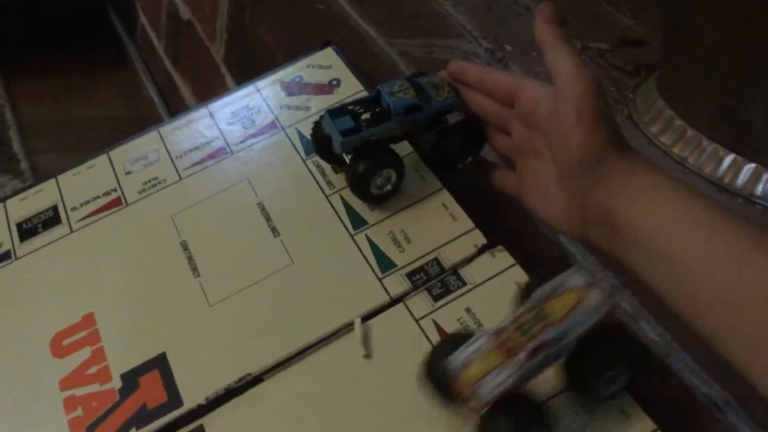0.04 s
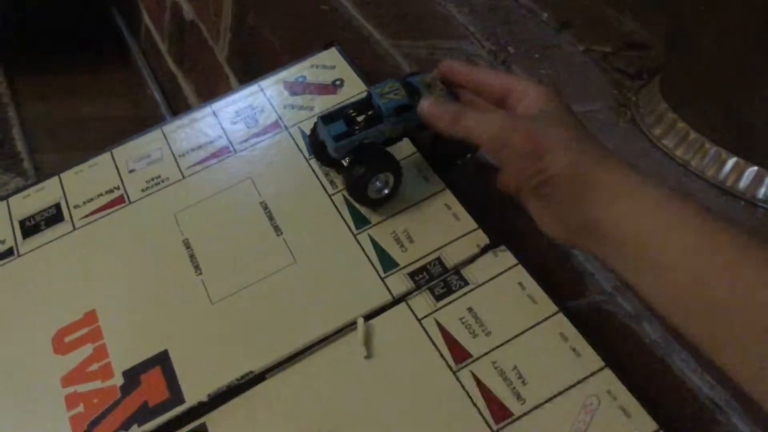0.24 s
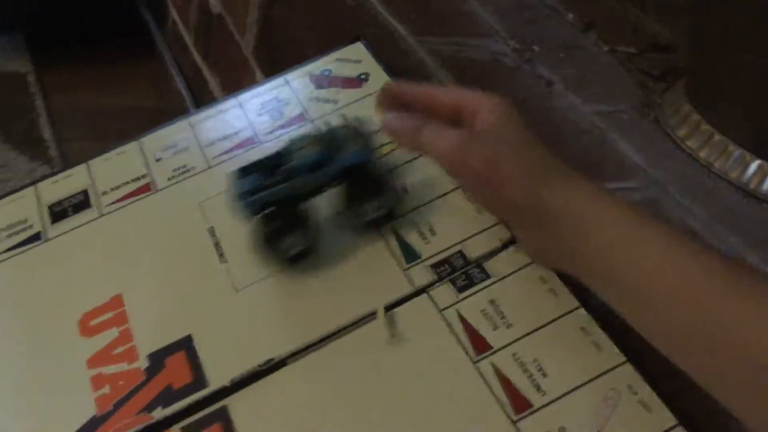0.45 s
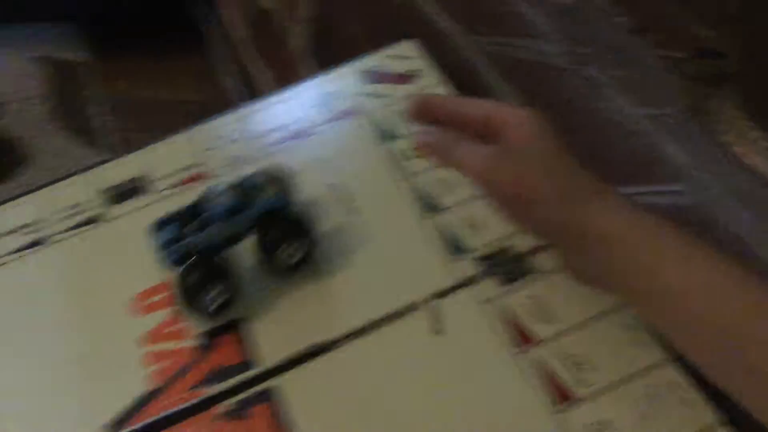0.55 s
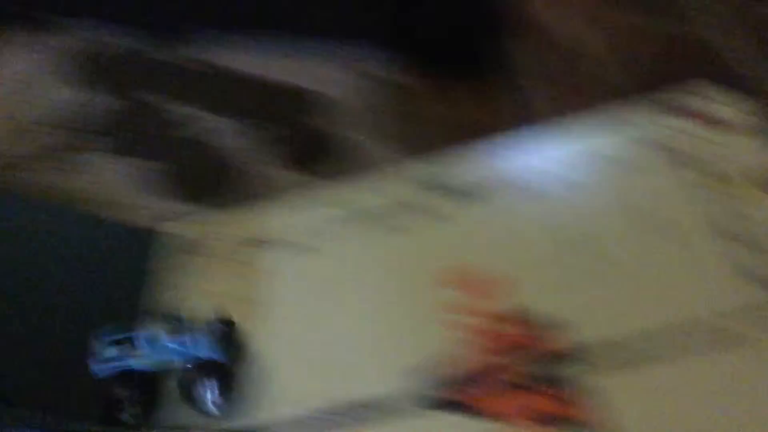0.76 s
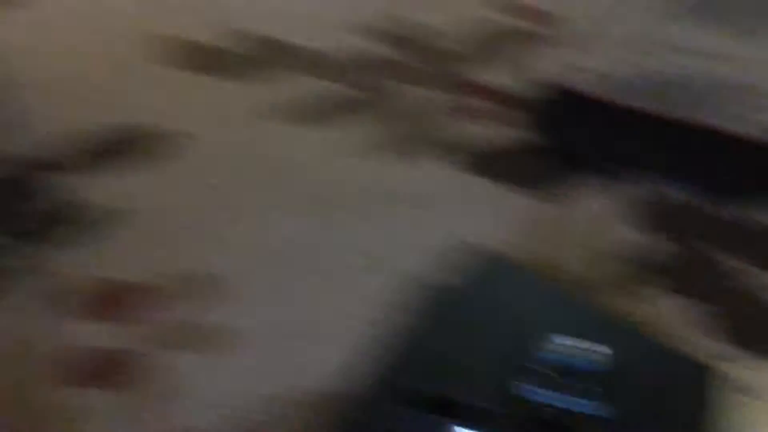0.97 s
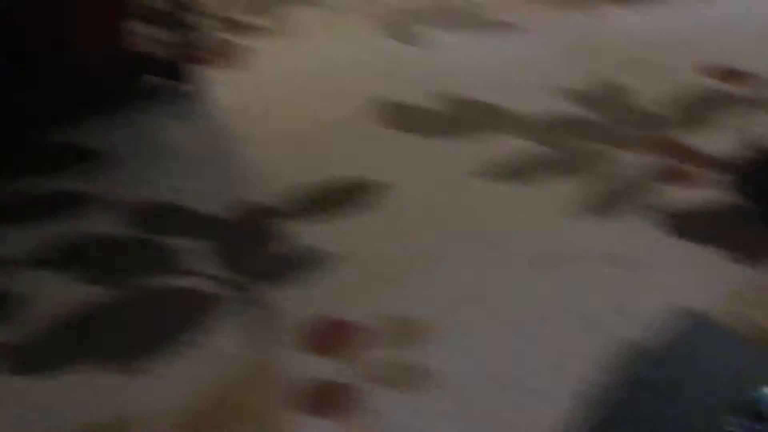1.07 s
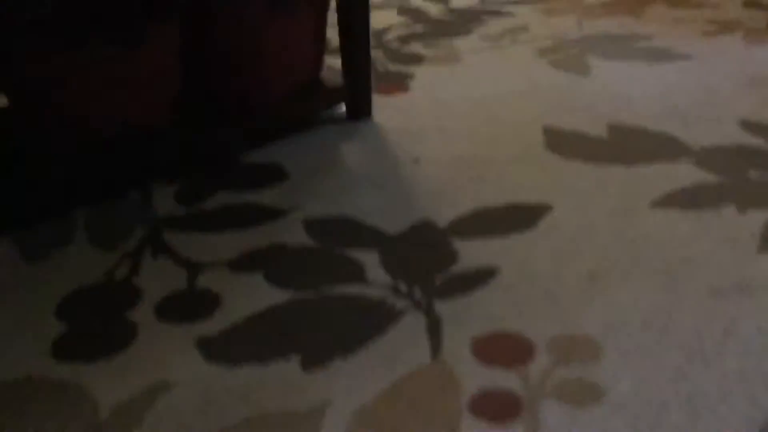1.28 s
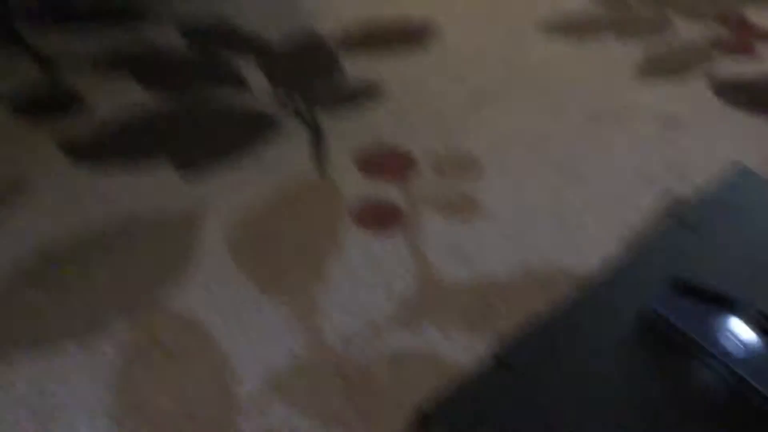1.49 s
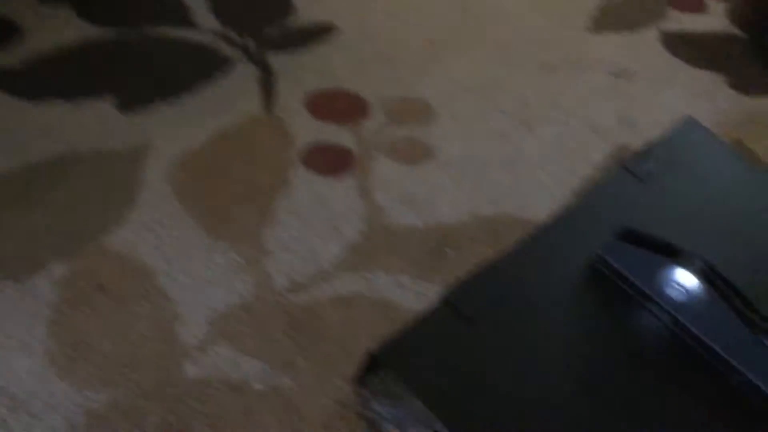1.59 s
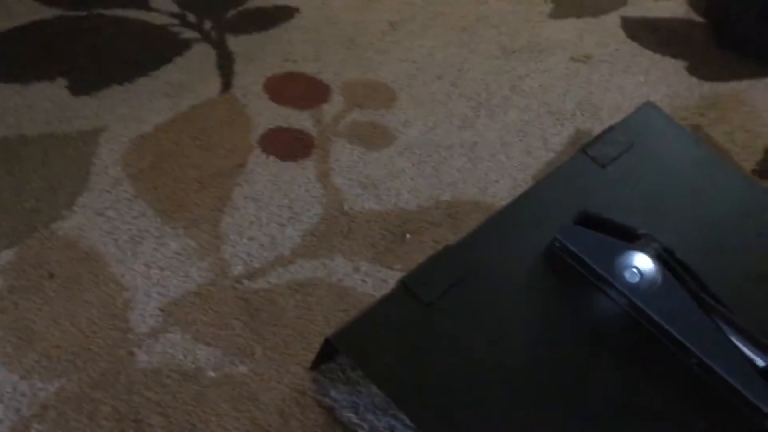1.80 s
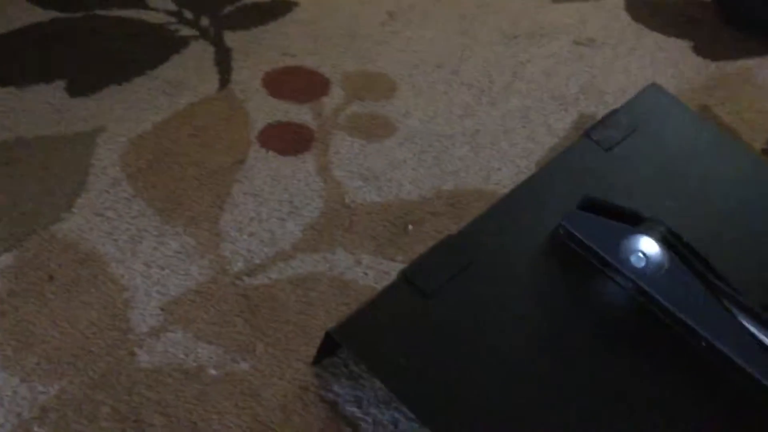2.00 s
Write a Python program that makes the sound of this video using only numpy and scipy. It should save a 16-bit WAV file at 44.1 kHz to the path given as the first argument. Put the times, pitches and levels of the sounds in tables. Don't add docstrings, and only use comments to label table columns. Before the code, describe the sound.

A plastic toy truck drums down a cardboard ramp, axles ticking, clacks over a fold, crashes onto a hollow case that briefly rings, then a softer roll and bump; close microphone in a quiet carpeted room.

```python
import sys
import numpy as np
from scipy import signal
from scipy.fft import rfft, irfft, next_fast_len
from scipy.io import wavfile
from scipy.ndimage import uniform_filter1d

SR = 44100
rng = np.random.default_rng(int(sys.argv[2]) if len(sys.argv) > 2 else 0)


def ratio_of_db(decibels):
    return 10 ** (np.asarray(decibels, float) / 20)


def store_wav(level_fs):
    pcm = np.round(np.clip(np.atleast_2d(level_fs), -1, 1) * 32767)
    wavfile.write(sys.argv[1], SR, pcm.T.astype(np.int16))


N = 90404
LANDING_S = 0.89
# pitch_hz [Hz], level_db [dB], t60_s [s]
CASE_MODES = [(263, -3, 0.18), (556.6, -8, 0.12), (1018, -18, 0.19), (1122, -14, 0.036),
              (1316, -10.5, 0.14)]


def unit(x):
    return x / np.sqrt(np.mean(x ** 2) + 1e-20)


def along(points, hz):
    f, v = np.transpose(points)
    return np.interp(np.log(hz + 1), np.log(f + 1), v)


def curve(rows):
    return ratio_of_db(np.interp(np.arange(N) / SR, *np.transpose(rows), left=-100, right=-100))


def causal(spectrum):
    gain = ratio_of_db(along(spectrum, np.fft.rfftfreq(4096, 1 / SR)))
    cepstrum = irfft(np.log(gain + 1e-6))
    fold = np.r_[1, np.full(2047, 2), 1, np.zeros(2047)]
    return irfft(np.exp(rfft(cepstrum * fold)))[:2048]


def coloured(x, spectrum):
    response = causal(spectrum)[(None,) * (x.ndim - 1)]
    return signal.fftconvolve(x, response, axes=-1)[..., :x.shape[-1]]


def resonant(x, peaks):
    m = next_fast_len(N + SR // 2)
    f = np.fft.rfftfreq(m, 1 / SR)
    response = 0
    for k, (centre, width, db) in enumerate(peaks):
        damping = 1j * f * width
        response = response + (-1) ** k * ratio_of_db(db) * damping / (centre * centre - f * f + damping)
    return irfft(rfft(x, m) * response, m)[:N]


def taps(rate, scatter, size_db):
    r = rng.standard_normal((2000, 2))
    at = ((np.arange(len(r)) + scatter * r[:, 0]) / rate * SR).astype(int)
    ok = (at >= 0) & (at < N)
    return unit(np.bincount(at[ok], ratio_of_db(size_db * r[ok, 1]), N))


def ring(modes, t, count, spread_db):
    hz, db, t60 = np.transpose(modes)[:, :, None]
    strength = ratio_of_db(spread_db * rng.standard_normal((count, len(modes))))
    return strength @ (ratio_of_db(db - 60 * t / t60) * np.sin(2 * np.pi * hz * t))


def struck(rows, gain_db, t60, rough, size):
    out, t = np.zeros(N + SR), np.arange(SR // 10) / SR
    at, db, hz = np.transpose(rows)[:, :, None]
    noise = uniform_filter1d(rng.standard_normal((len(rows), len(t))), size=size, axis=1)
    smear = (1 + rough * unit(noise)) / np.hypot(1, rough)
    onset = 1 - np.exp(-t / 0.00052)
    notes = ratio_of_db(db + gain_db - 60 * t / t60) * onset * smear * np.sin(2 * np.pi * hz * t)
    for s, note in zip(at[:, 0], notes):
        out[round(s * SR):][:len(t)] += note
    return out[:N]


def wheel_bumps():
    # start_s [s], peak_db [dB]
    thumps = [(0.087, -28.5), (0.132, -29), (0.155, -22.5), (0.21, -31), (0.307, -10.5), (0.344, -16),
              (0.413, -22), (0.591, -8.5), (0.61, -7), (0.652, -5.5), (0.705, -12), (0.761, -8.5),
              (0.812, -15), (0.899, -12), (0.941, -42), (0.964, -17), (1.078, -8), (1.249, -23.5),
              (1.618, -27), (1.671, -37), (1.832, -27.5)]
    # pitch_hz [Hz], width_hz [Hz], level_db [dB]
    thump_modes = [(291, 46, 1), (378, 94, -5.5)]

    def knock(x):
        return resonant(resonant(x, thump_modes), [(290, 770, 0)])

    blows = np.zeros(N)
    for at, db in thumps:
        blows[round(at * SR)] = ratio_of_db(db - 6)
    return knock(blows) / np.abs(knock(signal.unit_impulse(N))).max()


def rolling():
    # time_s [s], level_db [dB]
    pressure = [(0, -67.5), (.12, -51.5), (.21, -25.5), (.46, -20), (.56, -25), (.66, -20), (.745, -25.5),
                (.77, -22), (.98, -26), (1.06, -34), (1.1, -24), (1.2, -35), (1.3, -39), (1.41, -62.5),
                (1.53, -40), (1.72, -34.5), (1.765, -25.5), (1.9, -59.5), (2.05, -63)]
    # pitch_hz [Hz], level_db [dB]
    board = [(41, -91), (100, -34.5), (160, -12.5), (206, -14.5), (281, 3), (434, -9.5), (1110, -27.5),
             (1830, -38.5), (2500, -34.5), (3250, -70), (5500, -120)]
    # pitch_hz [Hz], width_hz [Hz], level_db [dB]
    board_modes = [(285, 132, 2), (336.4, 77, 2.5), (233, 20, -0.5), (445.5, 66, -7)]
    lugs_per_s, lug_scatter, lug_size_db, grit_share = 110, 0.6, 4.5, 1.2
    ring_db, roll_db, hollow_db = -6, -1.5, -19

    lugs = taps(lugs_per_s, lug_scatter, lug_size_db) + grit_share * rng.standard_normal(N)
    board_ring = resonant(resonant(lugs, board_modes), [(290, 550, 0)])
    drum = unit(unit(coloured(lugs, board)) + ratio_of_db(ring_db) * unit(board_ring))
    hollow = [(hz, np.log(1000) / np.pi / t60, db) for hz, db, t60 in CASE_MODES[1:]]
    on_case = lugs * curve(pressure) * (np.arange(N) > LANDING_S * SR)
    case = ratio_of_db(hollow_db) * resonant(on_case, hollow) / np.std(resonant(lugs, hollow))
    return ratio_of_db(roll_db) * curve(pressure) * drum + case + wheel_bumps()


def clacks():
    # start_s [s], peak_db [dB], knock_db over the peak [dB], t60_s [s]
    contacts = [(0.083, -54, 4, 0.075), (0.1717, -44, -4.5, 0.32), (0.337, -46, 10, 0.027),
                (0.543, -40, 20.5, 0.095), (0.569, -13.5, 1.5, 0.1), (0.5757, -20, 3.5, 0.19),
                (0.5945, -25, 10.5, 0.084), (0.609, -21, 1, 0.08), (0.615, -11, -7, 0.045),
                (0.6291, -30.5, 15, 0.17), (0.8369, -43, 15, 0.15), (0.8986, -15, 5, 0.15),
                (0.9345, -18.5, -13, 0.26), (0.9443, -16.5, -0.5, 0.12), (0.9664, -14.5, -1, 0.086),
                (0.9987, -17.5, -5.5, 0.13), (1.0164, -20, -6, 0.1), (1.0800, -25, 4, 0.14),
                (1.0871, -21, -1, 0.05), (1.1099, -22, -9.5, 0.13), (1.137, -26.5, -15, 0.16),
                (1.2531, -37.5, -8, 0.12), (1.2652, -32.5, -19, 0.045), (1.3038, -44, -26, 0.23),
                (1.3963, -38.5, -10.5, 0.081), (1.7504, -38.5, 9, 0.13), (1.7565, -36.5, -17, 0.07),
                (1.7764, -43.5, -5, 0.12)]
    # pitch_hz [Hz], level_db [dB]
    snap_spectrum = [(880, -14), (1500, -5), (1880, -1.5), (2320, -4.5), (3350, -3), (5280, -11),
                     (12000, -11.5), (16000, -22.5)]
    # pitch_hz [Hz], level_db [dB]
    knock_spectrum = [(240, -42), (400, 6), (848, -8.5), (1010, -3), (1480, -11.5), (3330, -22),
                      (4000, -70), (5200, -53), (8800, -120)]
    snap_db, body_db, case_db = -9, -5.5, -12.5
    crack, spike, chatter_db, strike_db = 0.25, 1.2, 3, 4.5

    out, t = np.zeros(N + SR), np.arange(SR // 2) / SR
    at, db, knock_db, t60 = np.transpose(contacts)[:, :, None]
    bounces = rng.standard_normal((len(at), len(t) // 75))
    chatter = ratio_of_db(chatter_db * np.repeat(bounces, 75, axis=1))

    def fade(longer):
        burst = ratio_of_db(-60 * t / np.clip(longer * t60, .005, .3))
        return burst + crack * ratio_of_db(-60 * t / 0.0043) + spike * ratio_of_db(-60 * t / 0.00061)

    snap = unit(coloured(chatter * rng.standard_normal(chatter.shape), snap_spectrum))
    knock = unit(coloured(chatter * rng.standard_normal(chatter.shape), knock_spectrum))
    dull = uniform_filter1d(snap, size=5, axis=1)
    hits = ratio_of_db(snap_db) * (dull * fade(0.86) + (snap - dull) * fade(0.74))
    hits = hits + ratio_of_db(body_db + knock_db) * knock * fade(1.35)
    case = ring(CASE_MODES, t, len(at), strike_db) * np.cos(np.pi * t) ** 2
    hits = ratio_of_db(db) * (hits + (at > LANDING_S) * ratio_of_db(case_db + knock_db) * case)
    for s, hit in zip(at[:, 0], hits):
        out[round(s * SR):][:len(t)] += hit
    return out[:N]


def lid():
    # start_s [s], pitch_hz [Hz], level_db [dB], t60_s [s]
    lid_notes = [(.9, 910, -35, 0.44), (.95, 910, -32.5, .6), (1.082, 910, -29, 0.46),
                 (1.26, 910, -47, 0.19), (1.54, 910, -50, 0.93), (1.63, 910, -54, .5), (1.76, 910, -51, .6),
                 (0.88, 651, -25.5, 0.32), (.955, 651, -25.5, 0.58), (1.131, 651, -41, 0.18),
                 (1.6, 651, -43, 0.24), (1.82, 651, -34.5, 0.23), (.95, 1020, -15.5, 0.094),
                 (1.08, 1020, -27, 0.22), (1.13, 566, -30, 0.29), (1.63, 566, -46, 0.2),
                 (1.8, 566, -51, 0.79), (1.741, 290, -18, 0.11), (1.753, 290, -17, 0.11),
                 (1.081, 400, -16, .09)]
    rise_s = 0.0063
    start, hz, db, t60 = np.transpose(lid_notes)[:, :, None]
    clock = np.arange(N) / SR
    t = np.clip(clock - start, 0, None)
    notes = ratio_of_db(db - 60 * t / t60) * (1 - np.exp(-t / rise_s)) * np.sin(2 * np.pi * hz * clock)
    return notes.sum(axis=0)


def loose_parts():
    # start_s [s], pitch_hz [Hz], level_db [dB], t60_s [s]
    pings = [(0.1704, 4600, -45, 0.05), (0.1702, 9100, -46, 0.03), (.241, 1122, -32, 0.04),
             (0.242, 8850, -46.5, 0.057), (.262, 3540, -37, 0.034), (.343, 3590, -42.5, 0.055),
             (0.571, 1126, -16, 0.041), (.615, 9400, -31, 0.018), (0.901, 1817, -19, 0.044),
             (0.899, 11580, -20, 0.013), (1.081, 1710, -31, 0.09), (1.399, 1675, -52, 0.065),
             (0.126, 1190, -50, 0.036), (1.109, 6710, -35, 0.086), (1.2, 6570, -52, 0.079),
             (1.255, 6000, -47.5, 0.11), (1.305, 3430, -50, 0.062), (1.487, 2770, -54.5, .02),
             (1.52, 1320, -66, 0.81), (1.406, 5940, -52.5, 0.06), (1.398, 3447, -54, 0.11),
             (1.757, 8010, -47, 0.019), (1.757, 11340, -51, 0.024)]
    out, t = np.zeros(N), np.arange(SR // 5) / SR
    for s, hz, db, t60 in pings:
        rubbing = unit(uniform_filter1d(rng.standard_normal(len(t)), size=90))
        envelope = ratio_of_db(db - 60 * t / t60) * (1 - np.exp(-t / 0.00033))
        out[round(s * SR):][:len(t)] += envelope * np.sin(2 * np.pi * hz * t) * (1 + 0.85 * rubbing)
    return out


def rattle():
    # time_s [s], level_db [dB]
    shake = [(.168, -47.5), (.3, -51.5), (.55, -48), (.62, -40), (.7, -41.5), (.8, -43.5), (.89, -49),
             (1.05, -42), (1.2, -49.5), (1.35, -65.5), (1.5, -69)]
    # pitch_hz [Hz], width_hz [Hz], level_db [dB]
    shell = [(2538, 5.7, 5), (3400, 385, -4.5), (4110, 18, 3.5), (4340, 21, -16), (4460, 92, -3.5),
             (6270, 48, -12), (8850, 110, -9)]
    # pitch_hz [Hz], level_db [dB]
    scrape = [(940, 0), (1600, 0), (2800, -4), (3560, -6), (5130, -11.5), (7920, -14), (8720, -16.5),
              (16000, -25)]
    ticks_per_s, tick_size_db, tick_t60_s = 240, 5, 0.014
    parts_per_s, part_size_db, part_t60_s = 40, 3.5, 0.067
    axle_db, hiss_db, shell_db = 0.5, -0.5, -0.5

    t = np.arange(SR // 5) / SR
    blows = taps(ticks_per_s, 0.75, tick_size_db)
    bursts = unit(signal.fftconvolve(blows, ratio_of_db(-60 * t / tick_t60_s))[:N])
    ticks = (bursts + ratio_of_db(hiss_db)) * rng.standard_normal(N)
    parts = np.zeros(N)
    for part in shell:
        jolts = taps(parts_per_s, 1.2, part_size_db)
        shaking = signal.fftconvolve(jolts, ratio_of_db(-60 * t / part_t60_s))[:N]
        parts += resonant(unit(ticks * shaking), [part])
    body = unit(coloured(ticks, scrape)) + ratio_of_db(shell_db) * unit(parts)
    return ratio_of_db(axle_db) * curve(shake) * unit(body) + loose_parts()


def wheel_skids():
    # start_s [s], peak_db [dB], pitch_hz [Hz]
    skids = [
        (0.701, -38, 9940),
        (0.7093, -39, 11820),
        (0.753, -40, 10400),
        (0.7744, -34.5, 10320),
        (0.793, -37, 9600),
        (0.8165, -40.5, 10530),
        (0.8645, -36.5, 10950),
    ]
    return struck(skids, gain_db=-4, t60=0.087, rough=4, size=5)


def axle_clicks():
    # start_s [s], peak_db [dB], pitch_hz [Hz]
    clicks = [(0.2139, -46, 11600), (0.2274, -46, 10500), (0.2404, -49, 10300), (0.2613, -49, 10200),
              (0.3346, -50, 11700), (0.3494, -37, 10200), (0.3574, -40, 10900), (0.3824, -47, 10300),
              (0.415, -43, 10400), (0.4539, -42, 10300), (0.4738, -37, 9980), (0.4913, -36, 12800),
              (0.5172, -43, 10000), (0.5304, -48, 9980), (0.5576, -32, 11400), (0.6664, -35, 10800),
              (0.7332, -41, 11900), (1.6023, -64, 11600), (1.6204, -64, 9610), (1.6694, -61, 10700),
              (1.6896, -62, 12000), (1.7065, -60, 11000), (1.7244, -58, 11600)]
    return struck(clicks, gain_db=-6, t60=0.017, rough=3.9, size=7)


def shell_taps():
    # start_s [s], peak_db [dB], pitch_hz [Hz]
    axle_taps = [(0.2034, -33, 3860), (0.2828, -35, 3420), (0.2992, -44, 3510), (0.3174, -41, 3710),
                 (0.3316, -36, 3520), (0.3644, -36, 3490), (0.3744, -35, 3340), (0.395, -37, 3680),
                 (0.4054, -43, 3570), (0.4364, -37, 3470), (0.5177, -41, 3460), (0.6754, -30, 3430),
                 (0.7023, -32, 4020), (0.7138, -31.5, 3800), (0.7437, -35.5, 3690), (0.7547, -40, 4000),
                 (0.7744, -33, 3750), (0.7942, -28, 3940), (1.6546, -54, 3270)]
    return struck(axle_taps, gain_db=-4, t60=0.044, rough=0.99, size=60)


def room(x):
    # pitch_hz [Hz], t60_s [s]
    walls = [(200, 0.31), (2000, 0.36), (12000, 0.15)]
    hz, t, z = signal.stft(rng.standard_normal(SR // 2), SR, nperseg=256)
    decay = ratio_of_db(-60 * t / along(walls, hz)[:, None])
    tail = signal.istft(z * decay, SR, nperseg=256)[1]
    delayed = np.pad(x, (200, 0))
    return signal.fftconvolve(delayed, tail / np.linalg.norm(tail))[:N]


def air():
    # pitch_hz [Hz], level_db [dB]
    tone_spectrum = [(35, -54), (60, 2.5), (238, -0.5), (2710, -28.5), (3420, -31.5), (3940, -32),
                     (5860, -24.5), (16000, -37)]
    # pitch_hz [Hz], level_db [dB]
    hiss_spectrum = [(590, -54), (1000, -16), (2340, -4.5), (2890, -13), (3850, -8), (6050, -20.5),
                     (6980, -22), (14000, -42)]
    # time_s [s], level_db [dB]
    hiss_level = [
        (0, -72),
        (1.4, -75),
        (1.6, -58.5),
        (2.05, -61),
    ]
    air_db, rise_db = -61.5, 1.5
    gain = ratio_of_db(air_db + rise_db * np.arange(N) / N)
    room_tone = gain * unit(coloured(rng.standard_normal(N), tone_spectrum))
    return room_tone + curve(hiss_level) * unit(coloured(rng.standard_normal(N), hiss_spectrum))


def scene():
    truck = rolling() + rattle() + clacks()
    truck = truck + wheel_skids() + axle_clicks() + shell_taps()
    wet_db = -9.5
    return (truck + ratio_of_db(wet_db) * room(truck) + lid() + air())[None]


def band_limit(x):
    return signal.sosfilt(signal.butter(12, 16970, fs=SR, output="sos"), x)


def record(dry):
    rounded = np.tanh(dry)
    bass_cut = signal.butter(3, 135, "high", fs=SR, output="sos")
    treble_cut = signal.cheby2(10, 40, 16400, fs=SR, output="sos")
    x = signal.sosfilt(treble_cut, signal.sosfilt(bass_cut, rounded))
    return band_limit(x)


dry = scene()
out = record(dry)
store_wav(out)
```